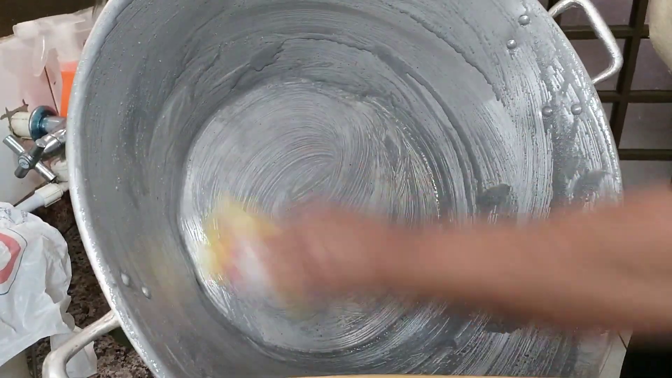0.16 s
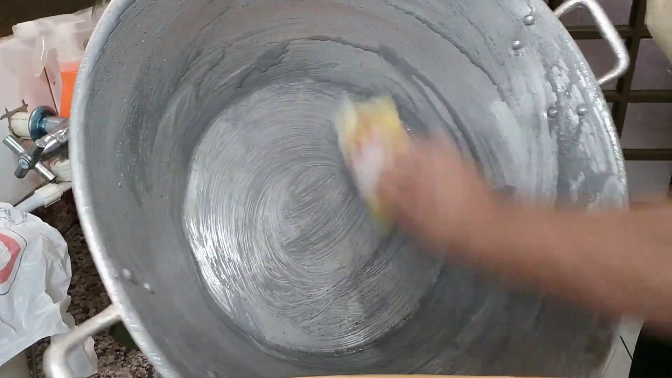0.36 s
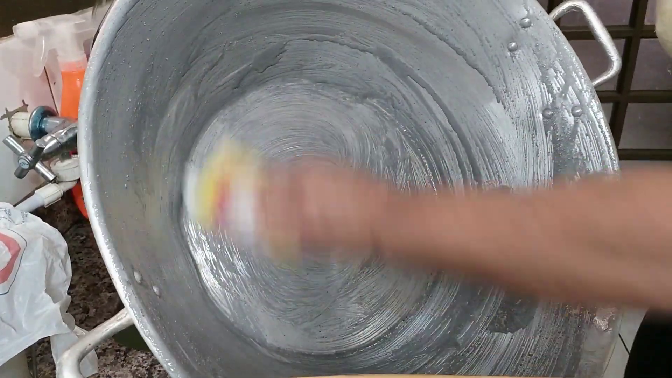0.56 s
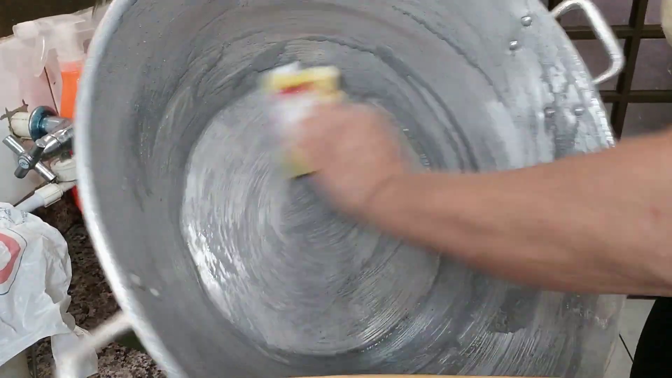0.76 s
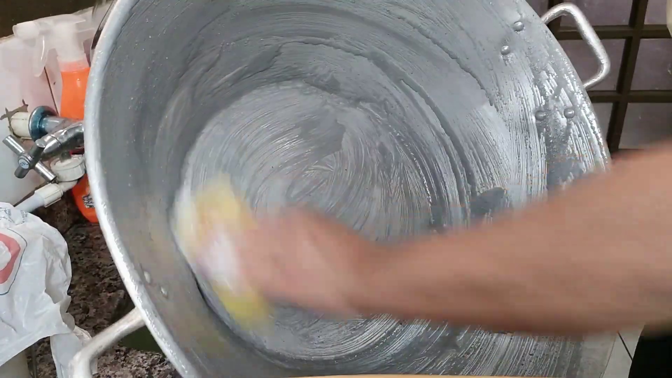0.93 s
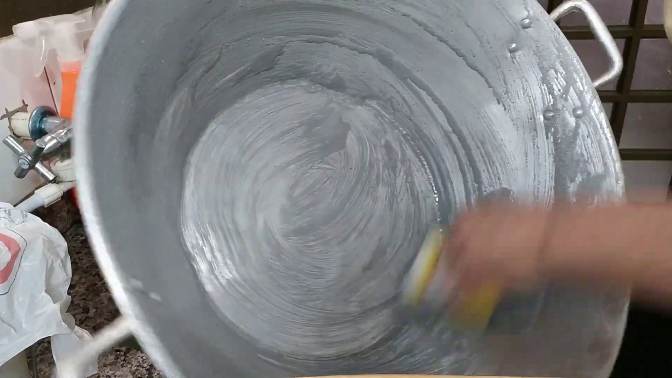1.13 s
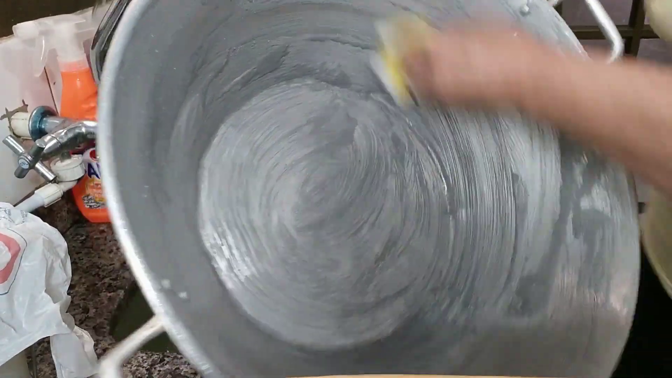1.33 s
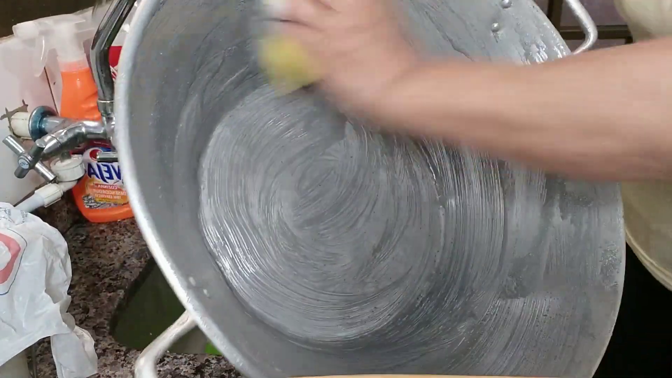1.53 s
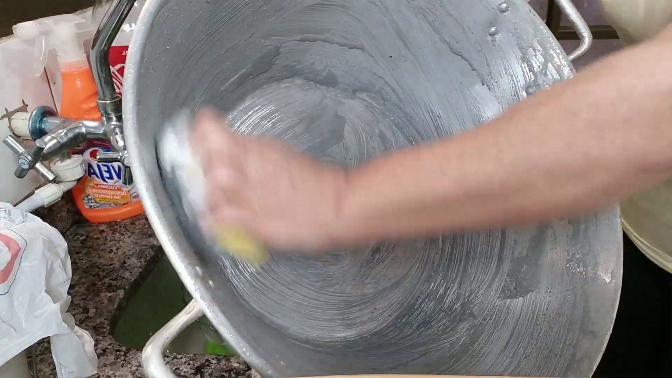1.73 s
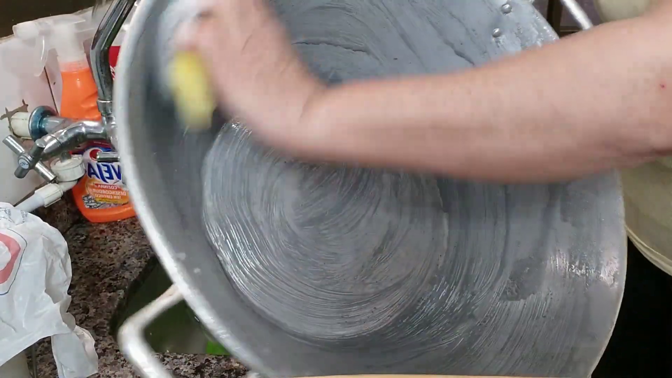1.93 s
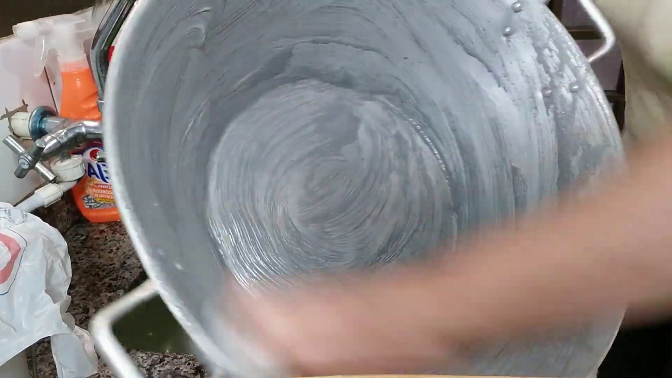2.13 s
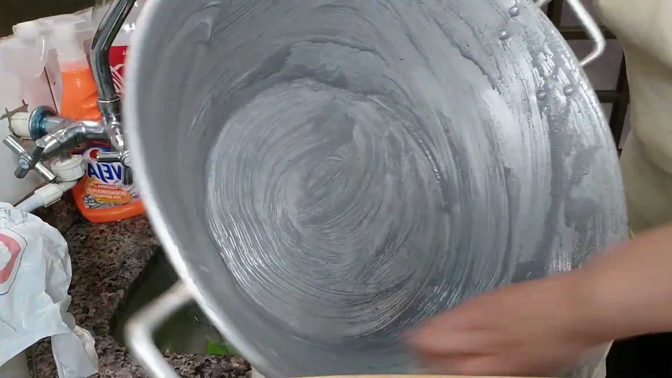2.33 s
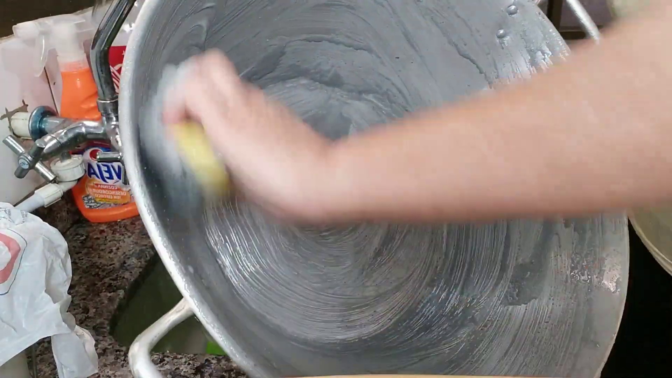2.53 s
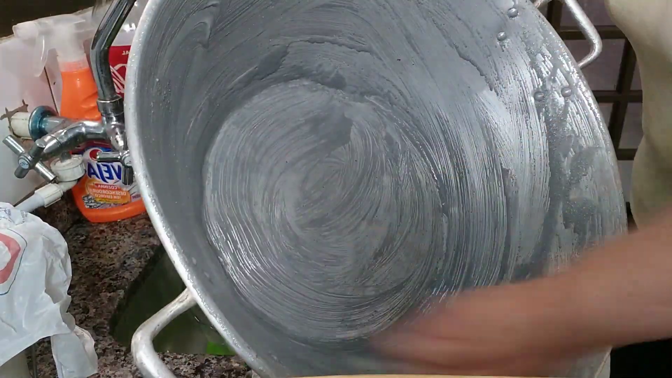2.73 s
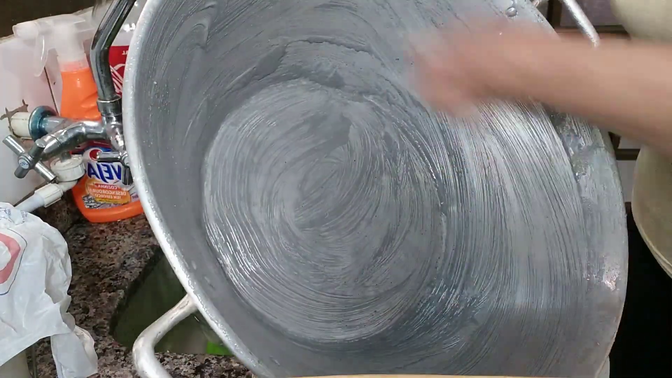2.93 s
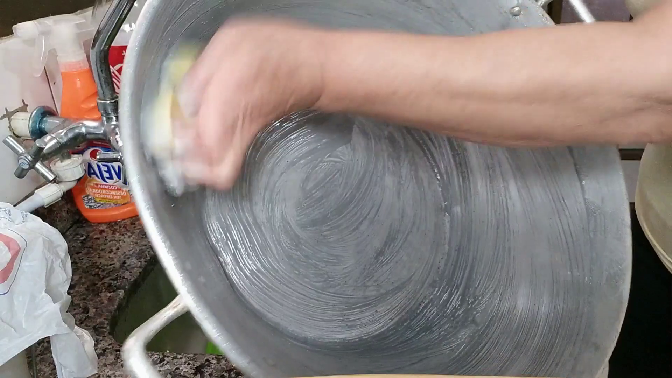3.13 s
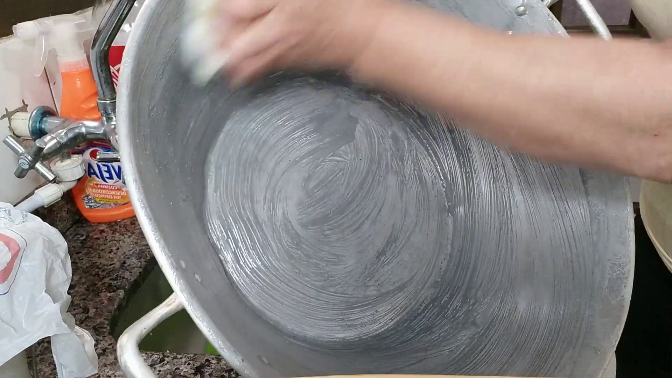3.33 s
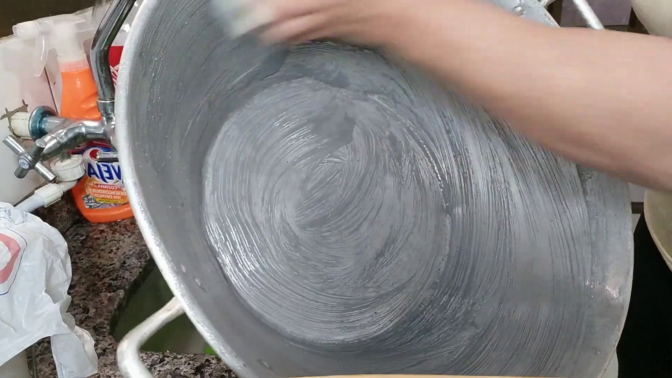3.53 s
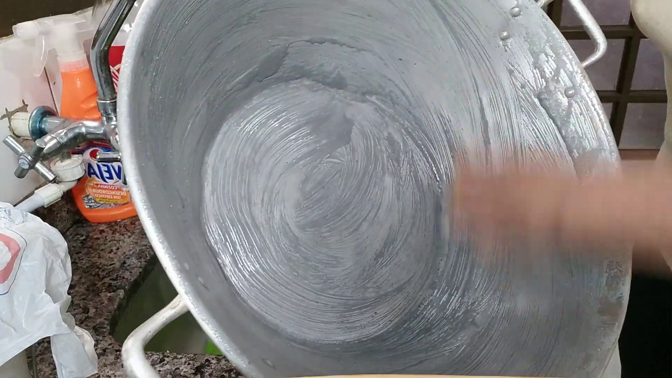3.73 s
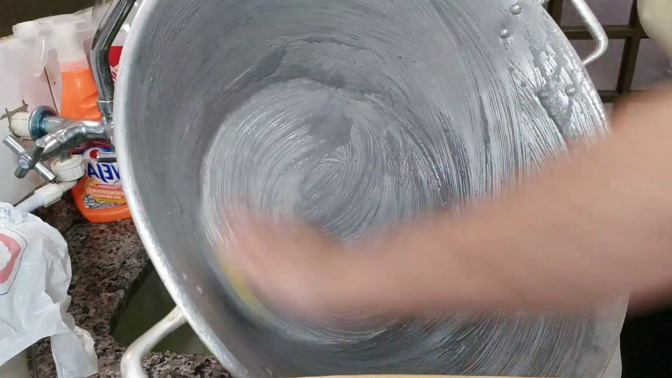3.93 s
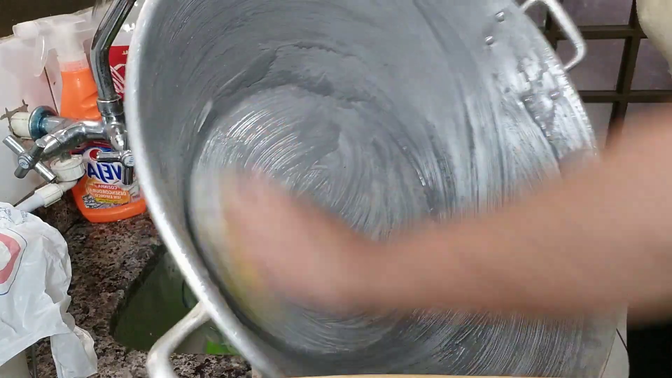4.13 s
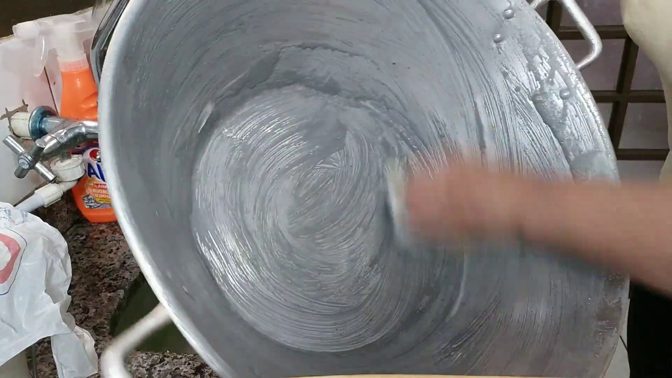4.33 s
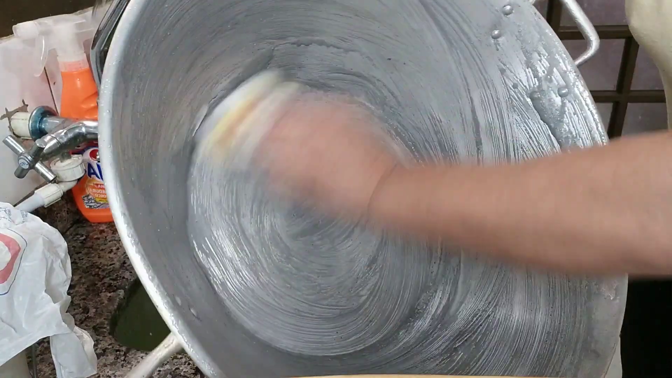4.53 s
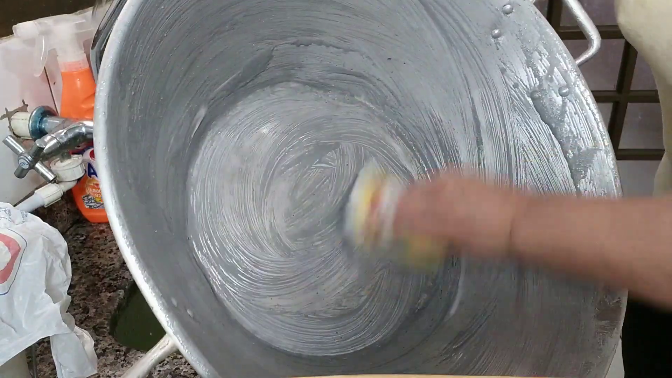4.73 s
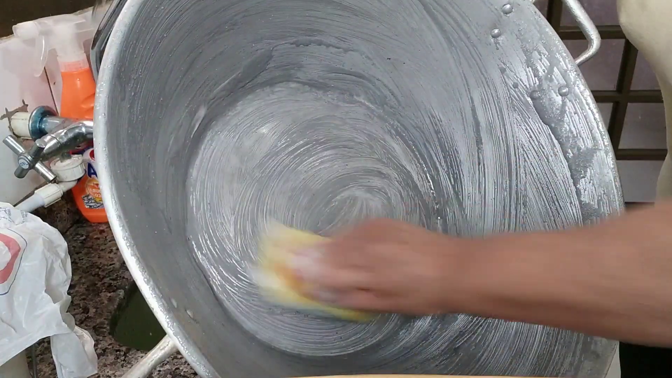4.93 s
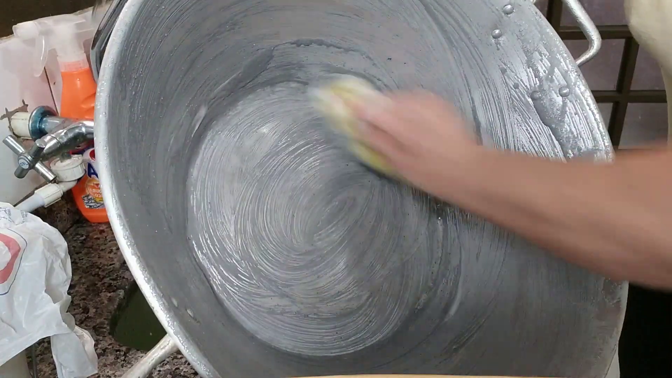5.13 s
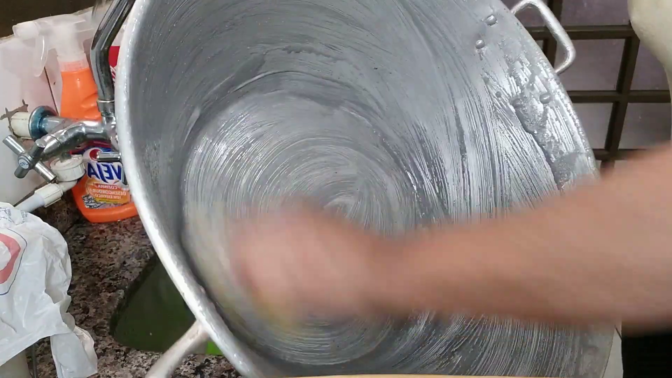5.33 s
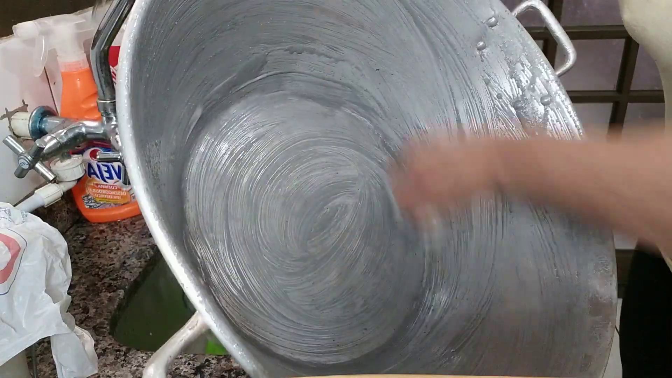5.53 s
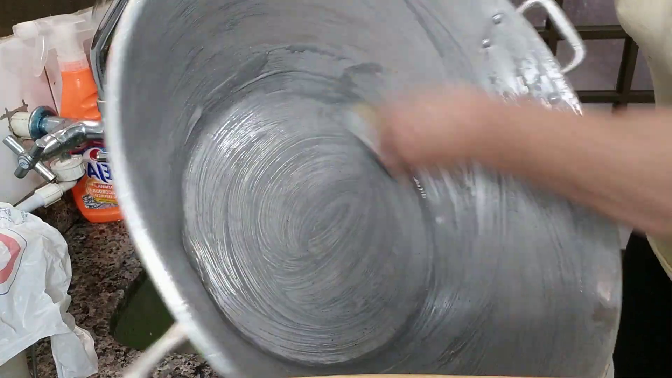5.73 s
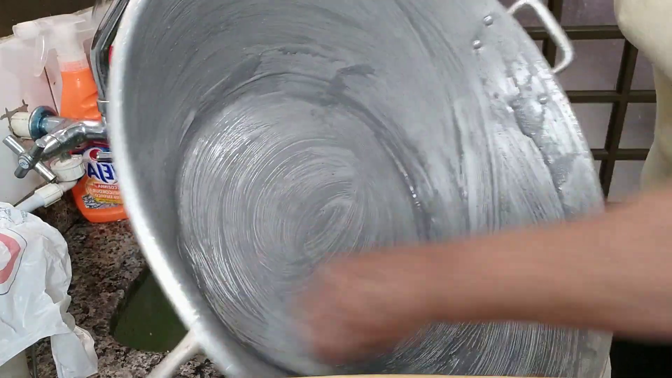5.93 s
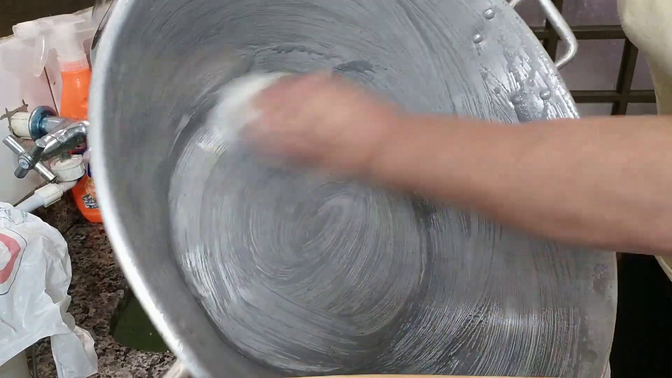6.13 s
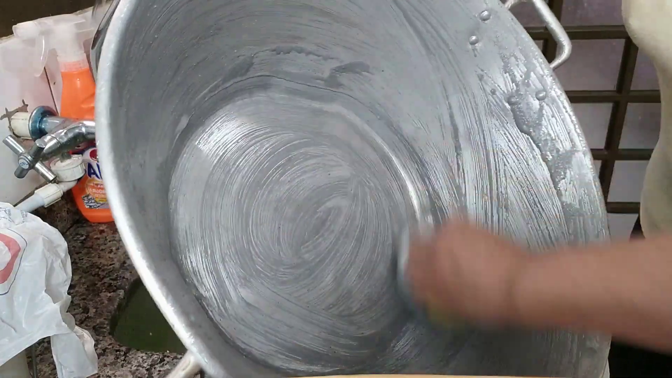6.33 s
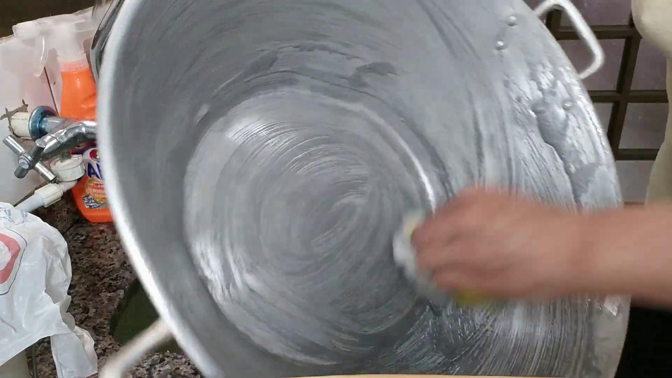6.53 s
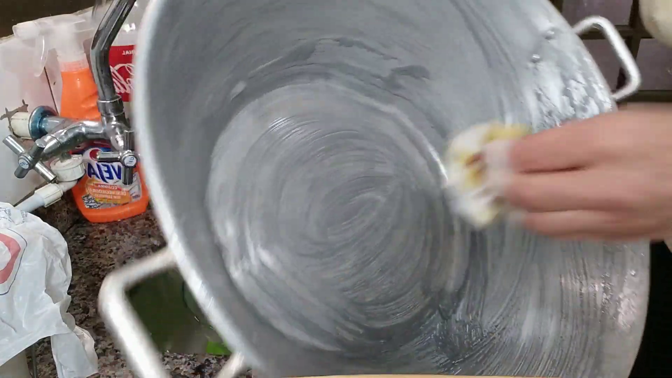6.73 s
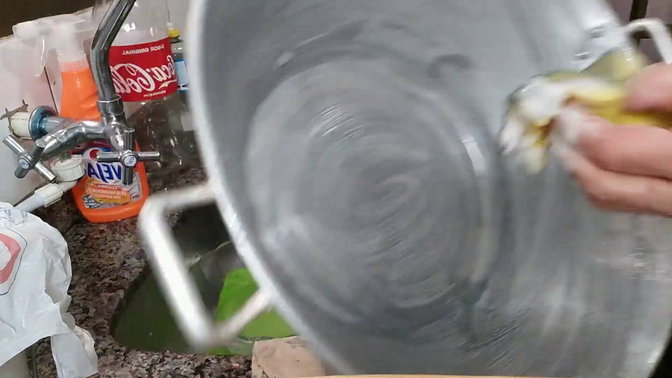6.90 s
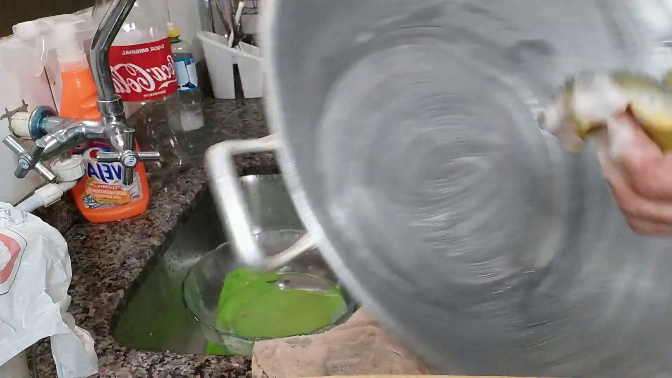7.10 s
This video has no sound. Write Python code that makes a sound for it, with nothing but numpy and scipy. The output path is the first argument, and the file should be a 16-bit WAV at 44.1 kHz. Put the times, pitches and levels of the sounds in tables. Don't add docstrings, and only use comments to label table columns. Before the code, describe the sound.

Close up in a home kitchen, a foamy scouring pad rubs around a large thin metal pot. Four strong metallic bangs come early as the base rocks on the sink, followed by softer bumps, a clear rim rap and scratchy catches on rivets. The steady hiss stops when the sponge lifts, leaving faint foam fizz, dull hum and a tiny drip.

```python
import sys
import numpy as np
from scipy import signal
from scipy.fft import rfft, irfft, next_fast_len
from scipy.io import wavfile
from scipy.ndimage import uniform_filter1d, map_coordinates

SR = 44100
rng = np.random.default_rng(int(sys.argv[2]) if len(sys.argv) > 2 else 0)


def generate_wav(signal):
    frames = np.transpose(np.atleast_2d(signal))
    scaled = np.clip(frames, -1, 1) * 32767
    pcm = np.round(scaled).astype(np.int16)
    wavfile.write(sys.argv[1], SR, pcm)


def invert_db(level):
    return 10 ** (np.asarray(level, dtype=float) / 20)


N = 315756

# pitch_hz, level_db (per Hz)
KITCHEN_TONE = [(25, -28), (55, 0), (100, -5.5), (195, -2.5), (300, -8), (500, -4), (650, -14), (830, -6.5),
                (1250, -21), (1400, -3.5), (1900, -13), (2080, -27), (5000, -38), (10400, -33),
                (16000, -52)]
# start_s, pitch_hz, level_db, t60_s
DRIP = (6.962, 1398, -42, .1)
# pitch_hz, base_bang_db, side_bump_db, t60_s
POT_MODES = [(128, -12, -5, 0.61), (191, -40, -7, 0.044), (243.4, -11, -5, 0.23), (338, -7, -1.5, 0.28),
             (414.7, -13, -14.5, 0.25), (713.3, -17.5, -3.5, 0.28), (738, -33, -12, 0.21),
             (830.6, -12, -6, 0.34), (925, -11.5, -24, 0.48), (973, -2, -22, 0.26), (998, -1, -24, 0.2),
             (1100, -18, 2.5, 0.2), (1151, -3, -11, 0.16), (1190, -30, -4.5, 0.15), (1414, -34, -12, 0.54),
             (1620, -7, -2, 0.13), (1700, -14.5, -15, 0.33), (1804, -13.5, -29, 0.47),
             (1871, -5.5, -5, 0.12), (2124, -29, -28, 0.24), (2497, -18, -3.5, 0.13),
             (2867, -8, -10, 0.082), (2915, -8.5, -27, 0.17), (2960, -25, -40, .12), (3420, -25, -11, 0.08),
             (3700, -34, -1, 0.11), (4020, -27, -25, .14), (4390, -25, 8, 0.032)]
# pitch_hz, t60_s
SHEET_DECAY = [(100, 0.14), (1000, 0.43), (2000, 0.21), (5000, 0.13), (12000, 0.039)]
# pitch_hz, level_db (per Hz)
CLATTER_COLOUR = [(47, -42), (80, 12), (515, -20), (1040, -1.5), (1410, -12.5), (1870, -7.5), (2280, -11.5),
                  (3940, -8.5), (6250, -23), (15000, -35)]
# pitch_hz, level_db (per Hz)
CRACK_COLOUR = [(1200, -37), (2000, -7.5), (3000, -5), (4200, 3), (6500, -6), (9000, -7), (15000, -23)]
# start_s, peak_db
BANGS = [
    (0.105, -5),
    (0.432, -6.5),
    (0.772, -10.5),
    (1.122, -8),
    (1.491, -29),
    (1.664, -29.5),
]
# start_s, middle_peak_db, then relative to it thud_db, deep_db, low_db
BUMPS = [(1.354, -39, -14, -10, -10), (2.074, -37.5, -12.5, -7, -1.5), (2.138, -36, -25, -7, -10),
         (2.489, -46.5, -26, -29, 3), (2.67, -45, -15, -5, 2), (2.792, -50, -19, 3.5, -1),
         (2.848, -47, -21, 1, -12), (4.09, -46, -20, -20, 3.5), (4.402, -20.5, -30, -21, -11),
         (4.458, -37, -8, -2, -14), (5.838, -23.5, -29.5, -10.5, -12.5), (6.153, -34, -35, -15, -6),
         (6.23, -42, -18, -6, 1), (6.263, -39.5, -22, -10, 3.5)]
# start_s, middle_peak_db, then relative to it thud_db, deep_db, low_db
RAPS = [
    (2.352, -21, -26, -21, -8.5),
    (3.665, -35.5, -35, -14, -21),
]
# pitch_hz, level_db
RIM_FAVOUR = [(100, -7), (700, -14.5), (920, 4), (1030, -9), (1105, 4), (1180, -2), (1440, -2), (5000, -8)]
# start_s, peak_db, fizz_share_db, t60_s
SNAGS = [(0.1043, -10, -11, 0.12), (0.4349, -19, -19, 0.094), (0.7494, -21.5, -9, 0.065),
         (1.102, -17, -9, 0.11), (1.6092, -17.5, -10, 0.11), (1.824, -18.5, -6, 0.14),
         (2.788, -12.5, -8, 0.11), (3.3243, -26, -17, 0.046), (3.7249, -16, -10, 0.091),
         (3.909, -20.5, -3, 0.06), (4.2878, -11.5, -10.5, 0.089), (4.663, -16, -6, 0.14),
         (5.4848, -13.5, -14, 0.14), (5.8376, -27, -17, 0.075), (6.2118, -20, -5, 0.06)]
# time_s, pressure_as_hiss_db, suds_squeezed_out_db
STROKE = [(0.0, -37, 2), (0.38, -39, 4), (0.6, -39.5, 2), (0.88, -38.5, 0.5), (1.45, -36, 0.8),
          (1.64, -38, 0.6), (1.83, -40, 1.1), (2.33, -37.5, -1), (2.73, -39, 3.5), (2.87, -35, 5),
          (3.0, -37, 1), (3.55, -40, 2.5), (3.75, -36.5, 4), (3.99, -34.5, 0.7), (4.17, -37.5, 1),
          (4.95, -38, 3.5), (5.6, -36.5, 2), (6.28, -36.5, 2)]
# time_s, hush_db,
# half_length_s
TURNS = [(0.34, 0.5, .015), (0.717, 8, 0.016), (1.423, 3, 0.051), (1.724, 5, 0.024), (2.325, 6.5, 0.04),
         (2.576, 6, 0.014), (3.176, 5.5, .013), (3.309, 6, 0.011), (3.426, 5.5, 0.02), (4.067, 5, 0.044),
         (5.679, 8.5, 0.026), (6.55, 4, 0.032), (6.84, 10, 0.078)]
# pitch_hz, level_db (per Hz)
PAD_COLOUR = [(880, -19.5), (1500, -7), (1840, -7.5), (2140, -5), (2250, -5.5), (2920, -4.5), (3920, 1),
              (5640, -5.5), (8000, -10), (10400, -28), (17600, -120)]
# pitch_hz, level_db (per Hz)
FIZZ_COLOUR = [(3200, -20), (5500, -7), (6750, -5.5), (8600, -1.5), (9600, 1.5), (11900, 2.5), (14500, 0),
               (15800, -1.5)]
# pitch_hz, level_db
SETTLED_FOAM = [(9000, 1.5), (12000, 0), (15000, -10), (15800, -16)]
# pitch_hz, level_db (per Hz)
WALL_COLOUR = [(40, -34), (141, -16.5), (233, -6), (337, -3.5), (500, -3), (600, -11), (702, 0.5),
               (1250, -4), (1700, -3), (2050, -5), (2300, -9), (3400, -40)]
# trail_db, fall_db_per_s, rest_db
AFTER_LIFT = [
    (-44.5, 38, -69.5),
    (-56.5, 48, -62.5),
    (-46, 30, -57),
]
# pitch_hz, width_hz, side_share
PORTS = [
    (1910, 270, 0.27),
    (9730, 270, -0.43),
]

KITCHEN_DB = -54
LIFT_S, LIFT_DB_PER_S2 = 6.26, 478
WALL_DB = -11
BASE_DB, BASE_FROM_S, MOVE_S = 4.5, 4, 0.12
SHAKE_DB, SHAKE_DB_PER_DB, SHAKE_T60_S, SHAKE_HISS_DB = -27.5, 0.59, 1.1, -7
RIPPLE_DB, RIPPLE_HZ = 1.5, 45


def unit(x):
    return x / np.sqrt(np.mean(x ** 2) + 1e-20)


def along(points, hz):
    point_hz, value = np.transpose(points)
    return np.interp(np.log(hz + 1), np.log(point_hz + 1), value)


def wobble(rate):
    knots = rng.standard_normal(int(N * rate / SR) + 4)
    return map_coordinates(knots, [np.arange(N) * rate / SR])


def filtered(x, response):
    size = next_fast_len(x.shape[-1] + 8192)
    spectrum = rfft(x, size) * response(np.fft.rfftfreq(size, 1 / SR))
    return irfft(spectrum, size)[..., :x.shape[-1]]


def coloured(x, spectrum):
    return unit(filtered(x, lambda hz: invert_db(along(spectrum, hz))))


def scratches(grit_db, patchy_db):
    slips = rng.standard_normal(N) * invert_db(grit_db * wobble(900))
    z = signal.stft(slips, nperseg=512)[2]
    patches = uniform_filter1d(rng.standard_normal(z.shape), 6, 0)
    patches = unit(uniform_filter1d(patches, 8, 1))
    return signal.istft(z * invert_db(patchy_db * patches), nperseg=512)[1][:N]


def add(out, start_s, sound):
    out[round(start_s * SR):][:len(sound)] += sound


def drip():
    start_s, hz, db, t60_s = DRIP
    t = np.maximum(np.arange(N) / SR - start_s, 0)
    envelope = invert_db(db - 60 * t / t60_s) * (1 - np.exp(-t / 0.0034))
    return envelope * np.sin(2 * np.pi * hz * t * (1 + 0.34 * t))


def kitchen():
    level = invert_db(KITCHEN_DB - 1.1 + 0.54 * wobble(3.9))
    return level * coloured(scratches(grit_db=-0.2, patchy_db=1.5), KITCHEN_TONE)


def blows(table, mode_db, high_db, clatter_db, crack_db, damping):
    out, t = np.zeros(N + SR), np.arange(SR * 2 // 5) / SR
    hz, t60 = np.transpose(POT_MODES)[[0, 3], :, None]
    for start_s, db, thud_db, deep_db, low_db in table:
        balance_db = [thud_db + 15, deep_db + 15.5, deep_db + 20.5, low_db + 13, low_db + 21.0,
                      0, 0, high_db + 5]
        place = lambda f: np.interp(f, [165, 195, 280, 310, 500, 650, 1350, 1550], balance_db)

        gains = invert_db(mode_db + place(hz[:, 0]) + rng.normal(0, 1.2, len(hz)))
        signs = (-1.) ** (hz[:, 0] // 260)
        drift = np.cumsum(rng.standard_normal((len(hz), len(t))), axis=1) * .012
        phase = 2 * np.pi * hz * t + .25 * rng.standard_normal(hz.shape) + drift
        ring = (gains * signs) @ (invert_db(-60 * damping * t / t60) * np.sin(phase))
        ring *= 1 - np.exp(-t / 0.0026)

        f, frame_s, z = signal.stft(rng.standard_normal(len(t)), SR, nperseg=128)
        decay = invert_db(-60 * damping * frame_s / along(SHEET_DECAY, f)[:, None])
        sheet = signal.istft(z * decay, SR, nperseg=128)[1][:len(t)]
        sheet = filtered(sheet, lambda f: invert_db(along(CLATTER_COLOUR, f) + place(f)))
        sheet *= 1 - np.exp(-t / 0.0012)

        crack = coloured(rng.standard_normal(len(t)), CRACK_COLOUR)
        crack *= invert_db(high_db - 60 * t / .045) * (1 - np.exp(-t / 0.0049))
        add(out, start_s, invert_db(db - 8) * (ring + invert_db(clatter_db) * sheet + invert_db(crack_db) * crack))
    return out[:N]


def rim_raps():
    hz, _, side_db, _ = np.transpose(POT_MODES)
    return blows(RAPS, side_db + along(RIM_FAVOUR, hz), high_db=-1.5, clatter_db=13, crack_db=-1.0,
                 damping=0.81)


def side_bumps():
    side_db = np.transpose(POT_MODES)[2]
    return blows(BUMPS, side_db, high_db=-0.4, clatter_db=18.0, crack_db=14.0, damping=1.24)


def base_bangs():
    base_db = np.transpose(POT_MODES)[1]
    tone_db = np.array([-33.5, -21, -18])
    table = [(start_s, db, *(tone_db - 0.22 * db)) for start_s, db in BANGS]
    return blows(table, base_db, high_db=-6.0, clatter_db=14.0, crack_db=-7.0, damping=1.206)


def snags():
    out, t = np.zeros(N + SR), np.arange(SR // 5) / SR
    for start_s, db, fizz_db, t60_s in SNAGS:
        contact = coloured(rng.standard_normal(len(t)), CRACK_COLOUR)
        fizz = coloured(rng.standard_normal(len(t)), FIZZ_COLOUR)
        envelope = invert_db(db - 11.5 - 60 * t / t60_s) * np.minimum(t / 0.0014, 1)
        add(out, start_s, envelope * (contact + invert_db(fizz_db + 10.0) * fizz))
    return out[:N]


def effort():
    t = np.arange(N) / SR
    stroke_s, *controls = np.transpose(STROKE)
    press_db, suds_db = (np.interp(t, stroke_s, v) for v in controls)
    off = np.maximum(t - LIFT_S, 0)
    peel = invert_db(-LIFT_DB_PER_S2 * off ** 2)
    hiss = invert_db(press_db) * peel

    power = np.zeros(N)
    for at, db, *_ in BANGS + BUMPS + RAPS:
        tremble_db = SHAKE_DB + SHAKE_DB_PER_DB * db - 60 * np.abs(t - at) / SHAKE_T60_S
        power += (t > at) * invert_db(tremble_db) ** 2
    shake = np.sqrt(power) * peel

    on_base = np.clip((t - BASE_FROM_S) / MOVE_S, 0, 1)
    wall = np.hypot(hiss * invert_db(WALL_DB + BASE_DB * on_base), shake)
    hiss = np.hypot(hiss, invert_db(SHAKE_HISS_DB) * shake)

    gains = []
    for gain, (trail_db, fall, rest_db) in zip([hiss, hiss * invert_db(suds_db), wall], AFTER_LIFT):
        left = np.hypot(invert_db(trail_db - fall * off), invert_db(rest_db))
        gains.append(np.hypot(gain, (off > 0) * left))
    return gains


def combed(x):
    knots = rng.standard_normal(2000)
    return filtered(x, lambda hz: invert_db(RIPPLE_DB * map_coordinates(knots, [hz / RIPPLE_HZ])))


def wall_modes(hz):
    response = 0.35
    for k, (mode_hz, _, side_db, t60_s) in enumerate(POT_MODES):
        drive = (-1) ** k * invert_db(1.12 * side_db) * 1j * hz * (4.6 / t60_s)
        response = response + drive / (mode_hz ** 2 - hz ** 2 + 1j * hz * 3.35 / t60_s)
    return response


def sponge():
    t = np.arange(N) / SR
    rub, foam, wall = effort()
    hush = sum(db * np.exp(-.5 * ((t - at) / half) ** 2) for at, db, half in TURNS)
    press = 0.99 * wobble(11) - hush
    hiss = rub * invert_db(1.5 + press) * coloured(scratches(grit_db=0.74, patchy_db=1.05), PAD_COLOUR)
    fizz = coloured(scratches(grit_db=0.5, patchy_db=1.14), FIZZ_COLOUR)
    fizz *= foam * invert_db(1.7 + 1.2 * press)
    settled = filtered(fizz, lambda hz: invert_db(along(SETTLED_FOAM, hz)))
    fizz = np.where(t < LIFT_S + .22, fizz, settled)
    rubbed = coloured(filtered(scratches(grit_db=1.0, patchy_db=1.7), wall_modes), WALL_COLOUR)
    return combed(hiss + fizz) + wall * invert_db(-0.27 + 0.6 * wobble(7.8) - 0.59 * hush) * rubbed


def scene():
    mono = kitchen() + drip() + rim_raps() + side_bumps() + base_bangs() + snags() + sponge()
    port = lambda f: sum(share * 1j * f * width / (centre ** 2 - f ** 2 + 1j * f * width)
                         for centre, width, share in PORTS)
    side = filtered(mono, port)
    return np.array([mono + side, mono - side])


def roll_off(x):
    return signal.sosfilt(signal.butter(12, 16990, fs=SR, output="sos"), x)


def record(dry):
    heard = filtered(dry, lambda hz: (hz < 15730) * (1j * hz / (55 + 1j * hz)) ** 2)
    return roll_off(heard)


dry = scene()
out = record(dry)
generate_wav(out)
```